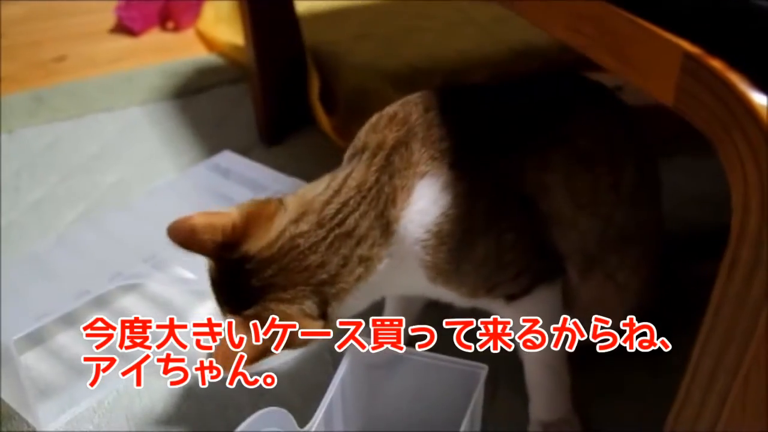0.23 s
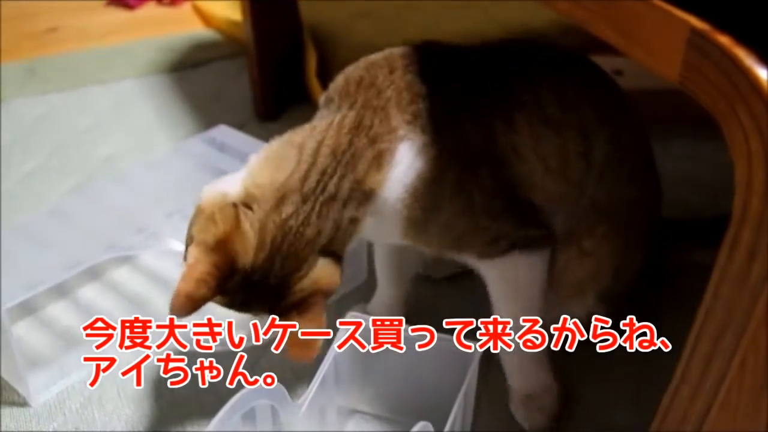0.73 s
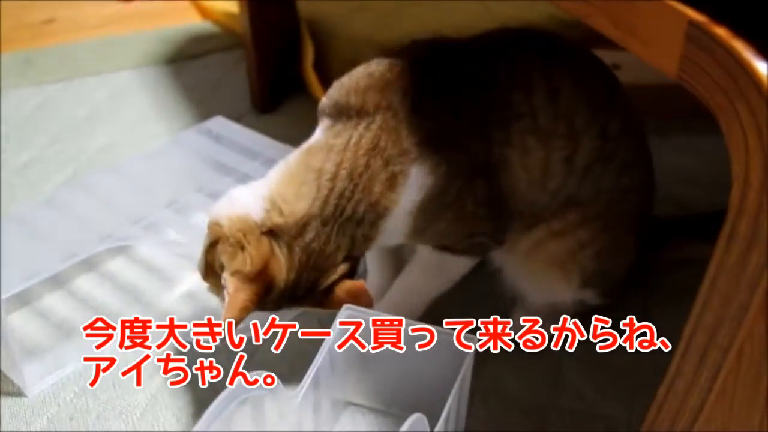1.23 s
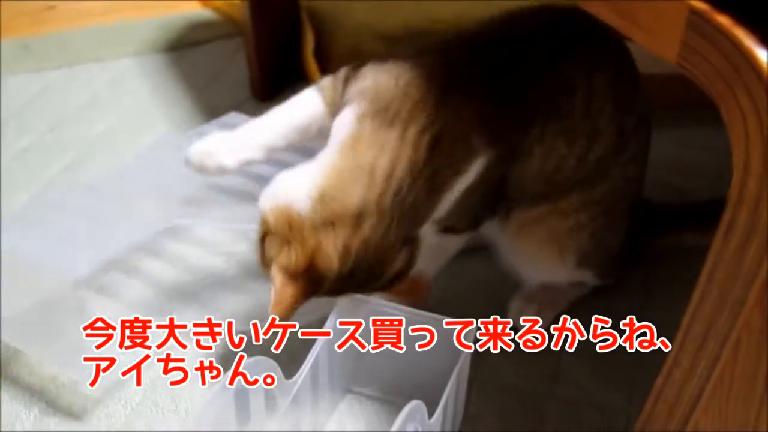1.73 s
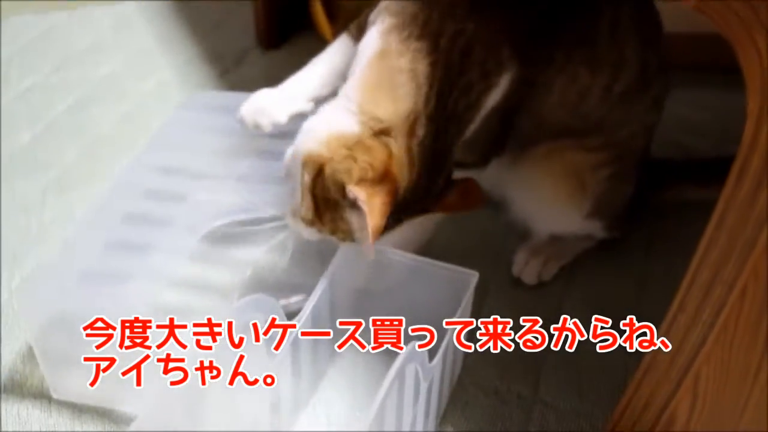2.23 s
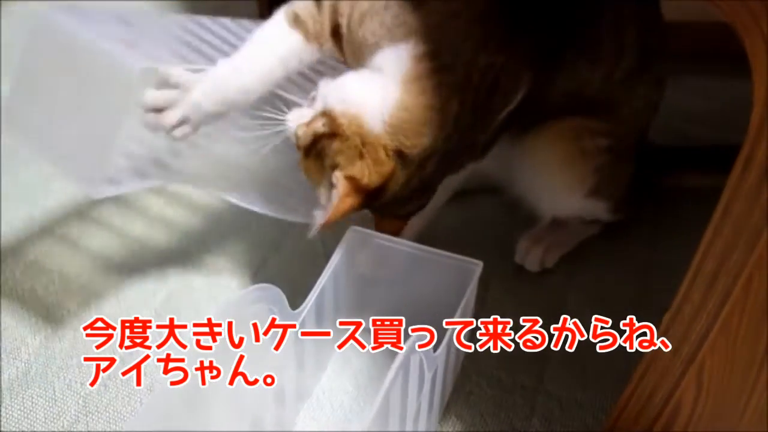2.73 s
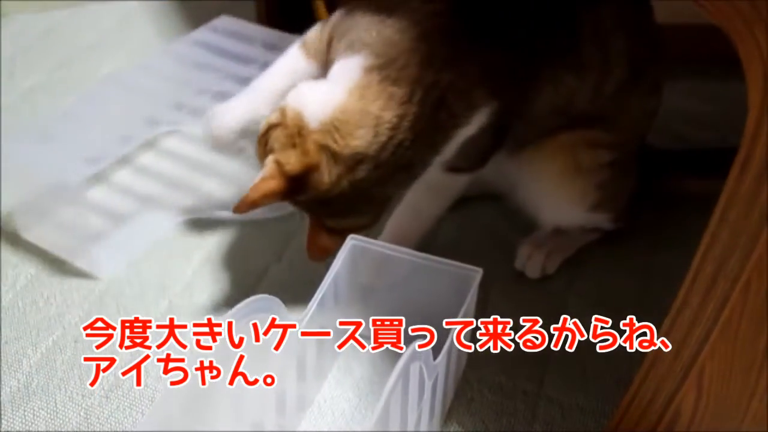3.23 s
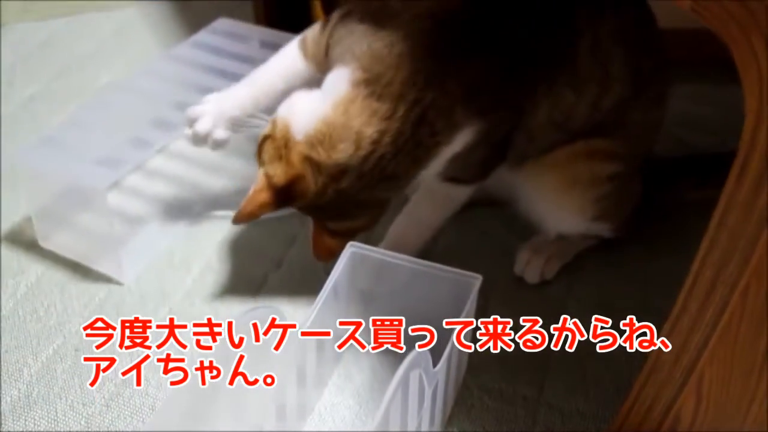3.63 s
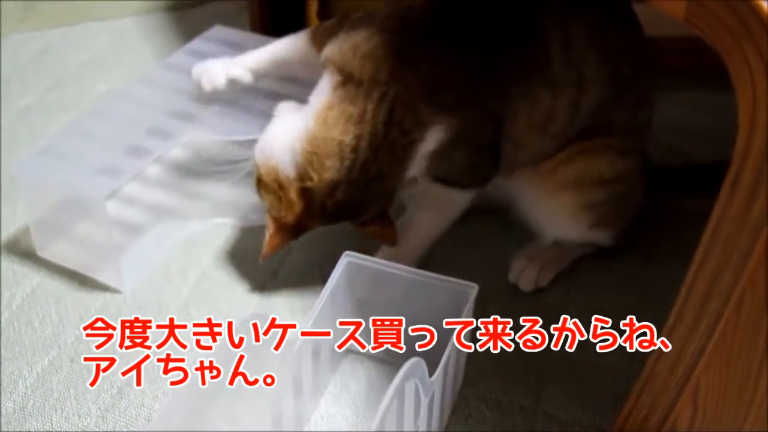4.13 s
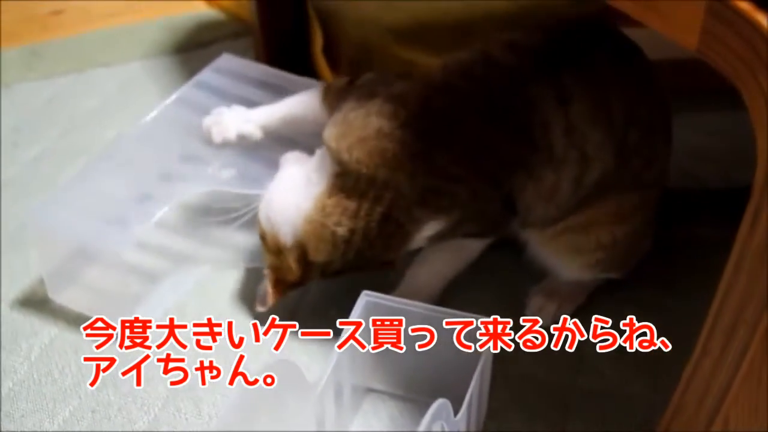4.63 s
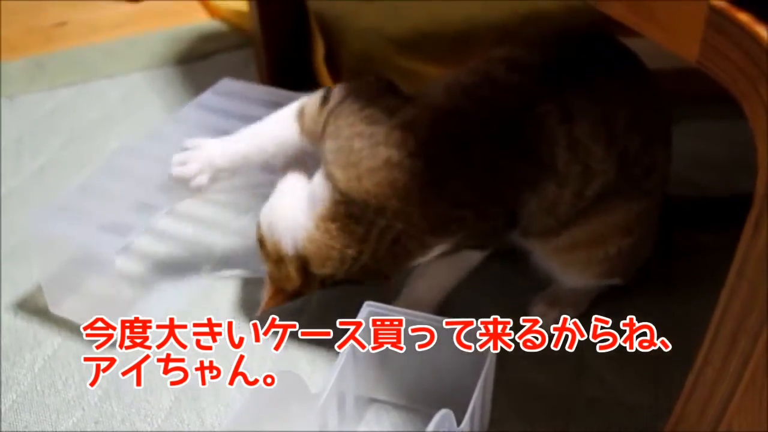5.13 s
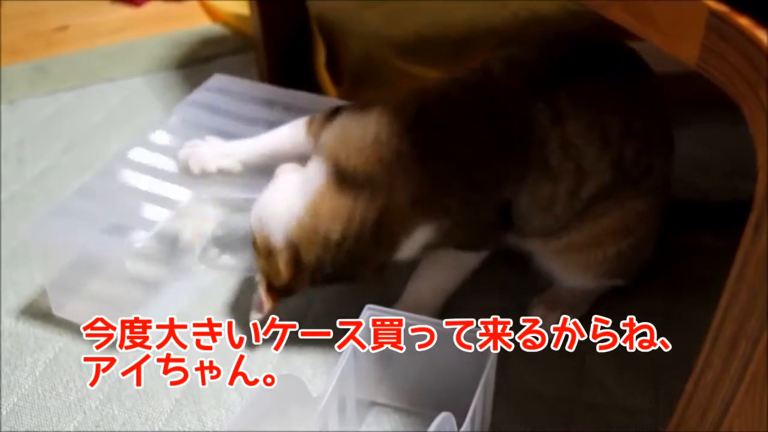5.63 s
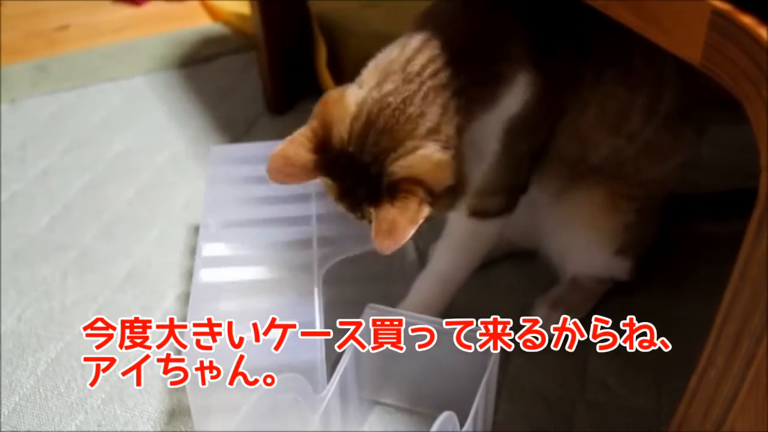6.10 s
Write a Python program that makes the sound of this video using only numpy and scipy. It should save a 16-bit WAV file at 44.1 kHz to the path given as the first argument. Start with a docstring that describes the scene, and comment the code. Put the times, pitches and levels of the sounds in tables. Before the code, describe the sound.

Light plastic boxes bump, clack and scuff on a padded floor under a cat's paws. The knocks are low and boxy with small rim clicks, uneven in timing, with pauses between clusters. Activity thickens around three and four seconds, peaks with a hard knock just after five, and ends in a scraping, thudding landing near six. Indoors and near, slightly right of centre, over quiet microphone hiss.

```python
"""In a small quiet room with a matted floor, a cat paws at thin plastic storage cases and pushes into one.
Contacts excite damped modes of walls and rim; random slips excite the plastic while it slides.
Strong blows also rattle the rim, and the weight of the case lands in dull, decaying thuds.
Every impact and slide gets a diffuse room answer; shaped noise and a sine give steady hiss and a high whine."""
import sys
import numpy as np
from scipy import signal
from scipy.fft import rfft, irfft, next_fast_len
from scipy.io import wavfile
from scipy.ndimage import map_coordinates

SR = 44100
rng = np.random.default_rng(int(sys.argv[2]) if len(sys.argv) > 2 else 0)


def waveform_to_disk(signal):
    """Save audio, clipped to [-1, 1], as 16-bit WAV at the path in sys.argv[1]."""
    frames = np.transpose(np.atleast_2d(signal))
    scaled = np.clip(frames, -1, 1) * 32767
    samples = np.round(scaled).astype(np.int16)
    wavfile.write(sys.argv[1], SR, samples)


N = 280631
TIME = np.arange(N) / SR
AGE = np.arange(SR // 4) / SR  # seconds since a contact

# Still air and microphone hiss. Each row: frequency in Hz, relative density in dB per Hz.
HISS_SPECTRUM = [(12, -21), (20, -18.5), (101, 2), (166, -5), (219, -2.5), (324, -3.5), (393, -4.5),
                 (565, -6), (788, -8.5), (932, -8), (1380, -11.5), (2090, -13.5), (3750, -15), (13900, -27),
                 (15500, -45)]
# Left-right correlation of the hiss. Each row: frequency in Hz, likeness from 0 to 1.
HISS_ALIKE = [(60, 0.6), (400, 0), (1200, 0), (4000, 0), (12000, 0)]
# Whine of the electronics. Each row: time in seconds, rms level in dB.
WHINE_LEVEL = [(0, -80), (0.45, -104), (0.7, -78.5), (6.36, -76.5)]
HISS_DB, WHINE_HZ = -54.17, 15278  # hiss level as rms

# Left-right correlation of the room answer. Each row: frequency in Hz, likeness from 0 to 1.
ROOM_ALIKE = [(100, 0.92), (550, 0.97), (1100, 0.64), (2500, .3), (8000, .05)]
# Reverberation. Each row: frequency in Hz, time to fall by 60 dB in seconds.
ROOM_T60 = [(100, 0.23), (350, 0.33), (1000, 0.26), (4000, 0.26), (12000, 0.26)]
# Colour of the room answer. Each row: frequency in Hz, gain in dB.
ROOM_LEVEL = [(100, -6), (350, -11.5), (700, -7), (1100, -4.5), (2000, -4), (5000, 1), (12000, -0.5)]
# Stereo balance of the case. Each row: frequency in Hz, left over right in dB.
BALANCE = [(100, -3), (300, -3.5), (600, -2), (1500, -2), (5000, -0.5), (12000, 0)]
TOP_HZ = 15750  # band limit

# Contacts of the case. Each row: start in seconds, blow level in dB, pitch of the struck spot in Hz,
# hardness as the rim click's level in dB relative to the blow level.
CONTACTS = [(0.772, -27, 416, -25.5), (0.866, -45, 442, -22), (0.896, -27, 262, -19),
            (0.945, -27, 438, -16.5), (1.029, -19, 287, -24.5), (1.231, -31.5, 450, -20.5),
            (1.577, -28, 310, -36), (1.649, -36.5, 368, -28), (1.913, -21, 277, -27.5),
            (2.14, -39, 452, -39), (2.212, -16.5, 560, -25), (2.536, -38, 428, -16),
            (2.613, -42.5, 550, -10.5), (2.737, -46.5, 523, -31), (2.914, -31, 445, -20.5),
            (2.932, -34.5, 510, -14), (2.937, -19, 305, -24), (2.954, -14, 501, -23.5),
            (2.99, -20.5, 420, -23.5), (3.094, -27.5, 558, -14.5), (3.625, -31.5, 573, -11.5),
            (3.641, -25, 533, -17.5), (3.847, -38, 514, -9.5), (3.889, -39, 520, -18),
            (4.046, -27.5, 390, -30), (4.071, -25, 392, -28), (4.148, -25, 410, -19.5),
            (4.274, -41.5, 460, -23), (4.375, -23.5, 415, -19), (4.405, -18.5, 388, -30.5),
            (4.438, -21, 450, -20.5), (4.643, -30, 438, -17), (4.739, -45.5, 269, -28),
            (5.014, -33.5, 490, -15), (5.037, -6.5, 570, -20.5), (5.075, -20, 312, -16.5),
            (5.081, -16, 316, -22), (5.288, -43.5, 350, -12.5), (5.454, -26.5, 420, -29.5),
            (5.481, -42, 480, -13.5), (5.561, -16, 520, -21.5), (5.635, -24, 447, -19),
            (5.923, -26, 246, -18.5), (5.954, -21, 285, -25), (5.967, -15, 306, -24.5),
            (5.978, -8.5, 420, -29.5), (6.128, -36, 490, -21)]
# Bending modes of the walls. Each row: frequency in Hz, relative level in dB, 60 dB decay time in s.
WALL_MODES = [(146, -20, .1), (182.3, -3, 0.13), (207.4, -3, 0.043), (266, 3.5, 0.19), (315.7, 3, 0.14),
              (338.6, 5, 0.083), (405.5, 2.5, 0.052), (430.7, 1.5, 0.057), (476, 1.5, 0.086),
              (501, 2, 0.077), (584.5, 0.5, 0.074), (613, -4.5, 0.049), (685.6, -2.5, 0.049),
              (748, -9, 0.068), (823, -8, 0.083), (920, -35.5, 0.032)]
# Modes of the stiff rim. Each row: frequency in Hz, relative level in dB, 60 dB decay time in s.
RIM_MODES = [(930, 4.5, 0.081), (890, -6, 0.01), (1142, 6, 0.026), (1280, -9, 0.0099), (1444, -6, 0.012),
             (1638, 5, 0.029), (1734, 4.5, 0.02), (1830, 3.5, 0.025), (1970, 8, 0.02), (2265, 1.5, 0.022),
             (2258, -4.5, 0.044), (2420, -9, 0.045), (2570, -13, 0.12), (3130, -15, 0.022)]
# Dense higher rim modes. Each row: frequency in Hz, relative density in dB per Hz.
CLACK_SPECTRUM = [(300, -25), (800, 8.5), (1100, 6.5), (2200, -1), (3000, -3.5), (5000, -30), (12000, -48)]
# Crack of the edge. Each row: frequency in Hz, relative density in dB per Hz.
SNAP_SPECTRUM = [(500, 1), (1200, 15), (2400, 3), (3500, 2), (4700, 3.5), (6000, -5), (8000, -8),
                 (11000, -17), (15500, -32.5)]
MID_HZ = 400  # pitch from which a spot's stiffness is counted in octaves
LONG_WALL_DB, LONG_WALL_DB_PER_OCTAVE = -12.5, -6  # a low, slack spot shakes the long walls
SHORT_WALL_DB, SHORT_WALL_DB_PER_OCTAVE = -11.3, 3.5  # a high, stiff spot shakes the short walls
STIFF_HZ, STIFF_LOSS_DB = 525, 10.5  # spots stiffer than this move the long walls less
DAMPING_DB_PER_DB, USUAL_DB = 0.17, -22  # a stronger blow presses harder and leaves less ring
SNAP_DB, SNAP_DB_PER_OCTAVE = -8, 8  # edge snap relative to rim tick: stiff spots lie near the edge
SWING_CYCLES, SWING_GROWTH = 1.23, 1.3  # cycles to the swing's peak at MID_HZ; octaves of cycles per octave
PRESS_DB, PRESS_HZ = -7.5, 142  # floor thud under the long walls, relative to their ring

# Plastic sliding on the mat, or paw on plastic. Each row: fastest moment in seconds, length scale in s,
# body in dB, rasp in dB relative to body, scratch in dB relative to rasp; all before SLIDE_TRIMS_DB.
SLIDES = [(0.83, 0.12, -52, -22, -4), (1.952, 0.29, -57, -0.5, -9.5), (2.604, 0.09, -50, -8.5, -22),
          (2.83, 0.27, -54, -29, -7), (3.163, 0.27, -54.5, -12.5, 2), (3.39, 0.036, -47, -4.5, 1.5),
          (3.646, 0.03, -44, -3.5, -0.5), (4.003, 0.045, -49, 4, -24), (4.082, 0.12, -44, -31, -3),
          (4.442, 0.072, -53, -3, -8), (5.057, 0.053, -36, -7.5, -3), (5.797, 0.19, -52, -1, -18),
          (5.86, 0.099, -46.5, 0, -14), (5.951, 0.035, -33.5, -14.5, -2), (6.113, 0.1, -46, -10.5, -5)]
# Walls driven by slips. Each row: frequency in Hz, relative density in dB per Hz.
SLIDE_BODY = [(60, 15), (150, 3.5), (300, 8.5), (550, 9.5), (750, -24), (1100, -40), (2000, -38),
              (5000, -89)]
# Rasp at the rim. Each row: frequency in Hz, relative density in dB per Hz.
SLIDE_RASP = [(400, -6), (750, 10), (1000, 5.5), (1500, 1.5), (2100, -1.5), (3200, -13), (6000, -45),
              (12000, -48)]
# Scratch at the edge. Each row: frequency in Hz, relative density in dB per Hz.
SLIDE_SCRATCH = [(1000, -28), (2800, 7), (4700, 4), (7500, -1), (10000, -13), (15500, -28)]
SLIDE_TRIMS_DB = (-1, -2, -2)  # added to the body, rasp and scratch levels
RISE_SHARE = 0.41  # part of the length scale used while speeding up

# Strong blows rattle the rim: threshold, level relative to their click, longest delay, loss by then.
RATTLE_FROM_DB, RATTLE_DB, RATTLE_S, RATTLE_LOSS_DB = -23.5, -12.5, 0.05, 7

# The whole weight landing. Each row: start in seconds, level in dB before LANDING_TRIM_DB, pitch in Hz.
LANDINGS = [(1.58, -31, 121), (2.956, -19, 114), (3.136, -27.5, 90), (4.072, -32.5, 131),
            (4.407, -30.5, 154), (5.075, -25.5, 147), (5.99, -20, 138), (6.10, -22, 101)]
LANDING_TRIM_DB = 1.5
REBOUND_S, REBOUND_LOSS_DB = 0.03, 10  # interval between thuds, loss at each


def amp(db):
    """Level: decibels to amplitude ratio."""
    return 10 ** (np.asarray(db) / 20)


def unit(x):
    """Power normalisation: scale to rms 1."""
    return x / np.sqrt(np.mean(x ** 2) + 1e-20)


def burst(x):
    """Energy normalisation: scale a short sound to the energy of 10 ms at rms 1."""
    return x / np.sqrt(np.sum(x ** 2) / (SR / 100) + 1e-20)


def along(points, hz):
    """Interpolation: read (Hz, value) points on a logarithmic frequency axis."""
    f, v = np.transpose(points)
    return np.interp(np.log(hz + 1), np.log(f + 1), v)


def filtered(x, response):
    """Linear filtering: multiply the spectrum by a response of frequency."""
    n = x.shape[-1]
    m = next_fast_len(n + 8192)
    hz = np.fft.rfftfreq(m, 1 / SR)
    return irfft(rfft(x, m) * response(hz), m)[..., :n]


def coloured(x, spectrum):
    """Spectral shaping: filter by (Hz, dB) points."""
    return filtered(x, lambda hz: amp(along(spectrum, hz)))


def stereo(pair, alike):
    """Correlation: mix two unrelated signals so left and right share the given likeness."""
    def mid_and_side(hz):
        angle = np.arccos(np.clip(along(alike, hz), -1, 1)) / 2
        return np.array([np.cos(angle), np.sin(angle)])

    mid, side = filtered(pair, mid_and_side)
    return np.array([mid + side, mid - side])


def add(track, s, sound):
    """Superposition: mix a sound into the track from time s."""
    part = track[:, max(round(s * SR), 0):][:, :sound.shape[-1]]
    part += sound[..., :part.shape[-1]]


def in_room(x, build_up=0.0025):
    """Reverberation: direct sound plus a fresh diffuse tail with frequency-dependent decay."""
    hz, t, noise = signal.stft(rng.standard_normal((2, SR // 2)), SR, nperseg=256)
    decay = amp(-60 * t / along(ROOM_T60, hz)[:, None])
    tail = signal.istft(noise * decay, SR, nperseg=256)[1]
    tail = stereo(coloured(tail / np.linalg.norm(tail[0]), ROOM_LEVEL), ROOM_ALIKE)
    tail = tail * (1 - np.exp(-(np.arange(tail.shape[1]) / SR / build_up) ** 2))
    tail[:, 0] += 1  # direct sound
    return signal.fftconvolve(x[None], tail, axes=1)


def background():
    """Stationary noise and a pure tone: still air, microphone hiss and the whine of camera electronics."""
    air = unit(stereo(coloured(rng.standard_normal((2, N)), HISS_SPECTRUM), HISS_ALIKE))
    whine_rms = amp(np.interp(TIME, *np.transpose(WHINE_LEVEL)))
    whine = np.sqrt(2) * whine_rms * np.sin(2 * np.pi * WHINE_HZ * TIME)
    return amp(HISS_DB) * air + whine


def swell(rise):
    """Contact compliance: a soft contact has a smooth onset."""
    return 1 - np.exp(-(AGE / rise) ** 2)


def ring(modes, weights, attack, free_share=0.51, settle=0.012):
    """Modal superposition: damped sines, varied each time as the cat's weight strains the plastic."""
    hz, db, t60 = np.transpose(modes)[:, :, None]
    hz = hz * rng.normal(1, .008, hz.shape)
    db = db + rng.normal(0, 2.5, hz.shape)
    # paw and mat soak up part of the swing early; the rest rings on freely
    grip = free_share + (1 - free_share) * np.exp(-(AGE / settle) ** 2)
    partials = amp(db - 60 * AGE / t60) * np.sin(2 * np.pi * hz * AGE)
    return burst(weights @ partials * swell(attack) * grip)


def wall_knock(pitch_hz, long_db, short_db, cycles, flex_db=-5, reach=1.48, split_hz=400, lag=0.001):
    """Forced plate bending: the spot swings briefly; long walls ring low and short walls higher."""
    growth = AGE * pitch_hz / cycles
    flex = growth * np.exp(1 - growth) * np.sin(2 * np.pi * pitch_hz * AGE)
    mode_hz = np.transpose(WALL_MODES)[0]
    long_share = 1 / (1 + (mode_hz / split_hz) ** 8)
    # modes far above the spot's pitch are driven least
    driven = 1 / np.sqrt(1 + (mode_hz / (reach * pitch_hz)) ** 4)
    sound = amp(flex_db) * flex
    sound += amp(long_db) * ring(WALL_MODES, long_share * driven, attack=0.0033)
    sound += amp(short_db) * ring(WALL_MODES, (1 - long_share) * driven, attack=0.0025)
    # the broad walls move just after the rim is touched
    return np.interp(AGE - lag, AGE, sound, left=0)


def floor_thud(hz, t60=0.063, attack=0.0014):
    """Heavily damped oscillation: the padded floor takes weight with a few dull cycles."""
    return np.sin(2 * np.pi * hz * AGE) * amp(-60 * AGE / t60) * swell(attack)


def rim_tick(ring_db=-4, clack_db=-3.5, clack_t60=0.017):
    """Modal density: a few clear rim modes over dense ones approximated by decaying noise."""
    clear = ring(RIM_MODES, rng.choice([-1, 1], len(RIM_MODES)), attack=0.00061)
    noise = coloured(rng.standard_normal(len(AGE)), CLACK_SPECTRUM)
    dense = burst(noise * amp(-60 * AGE / clack_t60) * swell(0.0017))
    return amp(ring_db) * clear + amp(clack_db) * dense


def edge_snap(crack_t60=0.0052, chatter_db=-16, chatter_t60=0.032):
    """Two-stage decay: noise falls fast as the edge cracks, then slower as it chatters."""
    decay = amp(-60 * AGE / crack_t60) + amp(chatter_db - 60 * AGE / chatter_t60)
    noise = coloured(rng.standard_normal(len(AGE)), SNAP_SPECTRUM)
    return burst(noise * decay * swell(0.0011))


def knocks():
    """Impact excitation: a spot's stiffness divides each blow among walls, floor and edge snap."""
    out = np.zeros((2, N))
    for s, db, pitch_hz, hardness_db in CONTACTS:
        octaves = np.log2(pitch_hz / MID_HZ)
        damping_db = DAMPING_DB_PER_DB * (db - USUAL_DB)
        stiff_db = STIFF_LOSS_DB * (pitch_hz > STIFF_HZ)
        long_db = LONG_WALL_DB + LONG_WALL_DB_PER_OCTAVE * octaves - stiff_db - damping_db
        short_db = SHORT_WALL_DB + SHORT_WALL_DB_PER_OCTAVE * octaves - damping_db
        cycles = SWING_CYCLES * 2 ** (SWING_GROWTH * octaves)
        body = wall_knock(pitch_hz, long_db, short_db, cycles)
        press = amp(long_db + PRESS_DB) * floor_thud(PRESS_HZ)
        snap_db = SNAP_DB + SNAP_DB_PER_OCTAVE * octaves
        click = rim_tick() + amp(snap_db) * edge_snap()
        add(out, s, in_room(amp(db) * (body + press + amp(hardness_db) * click)))
    return out


def slides(slip_rate=1800, smooth_share=0.22):
    """Friction: random slips (slip_rate per second) and smooth noise drive walls, rim and edge."""
    levels = np.zeros((3, N))
    for s, length, body_db, rasp_db, scratch_db in SLIDES:
        side_length = length * np.where(TIME < s, RISE_SHARE, 1 - RISE_SHARE)
        speed = np.exp(-((TIME - s) / side_length) ** 2)
        layer_db = np.cumsum([body_db, rasp_db, scratch_db]) + SLIDE_TRIMS_DB
        levels += np.outer(amp(layer_db), speed)
    slips = unit((rng.random(N) < slip_rate / SR) * rng.standard_normal(N))
    friction = slips + smooth_share * rng.standard_normal(N)
    sound = np.zeros(N)
    for level, colour in zip(levels, (SLIDE_BODY, SLIDE_RASP, SLIDE_SCRATCH)):
        sound += level * unit(coloured(friction, colour))
    return in_room(sound)[:, :N]


def rattles(count=4):
    """Repeated impact: after a strong blow the loose rim gives irregular ticks, later ones weaker."""
    out = np.zeros((2, N))
    for s, db, _, hardness_db in CONTACTS:
        if db > RATTLE_FROM_DB:
            chatter = np.zeros((1, len(AGE)))
            for late in rng.uniform(.1, 1, count):
                add(chatter, late * RATTLE_S, amp(-RATTLE_LOSS_DB * late) * rim_tick())
            add(out, s, in_room(amp(db + hardness_db + RATTLE_DB) * chatter[0]))
    return out


def landings(count=3):
    """Energy loss on rebound: the case lands and rocks to rest, each thud weaker than the last."""
    out = np.zeros((2, N))
    for s, db, hz in LANDINGS:
        for k in range(count):
            thud = amp(db + LANDING_TRIM_DB - k * REBOUND_LOSS_DB) * floor_thud(hz)
            add(out, s + k * REBOUND_S, in_room(thud))
    return out


def scene(lowest_hz=64):
    """Radiation: the small case radiates little deep bass and sounds slightly to the right."""
    case = knocks() + rattles() + landings() + slides()
    case = signal.sosfilt(signal.butter(3, lowest_hz, "high", fs=SR, output="sos"), case)
    placed = filtered(case, lambda hz: amp(np.outer([.5, -.5], along(BALANCE, hz))))
    return placed + background()


def record(dry):
    """Band limitation: the camera keeps nothing at or above its upper limit."""
    return filtered(dry, lambda hz: hz < TOP_HZ)


dry = scene()
out = record(dry)
waveform_to_disk(out)
```